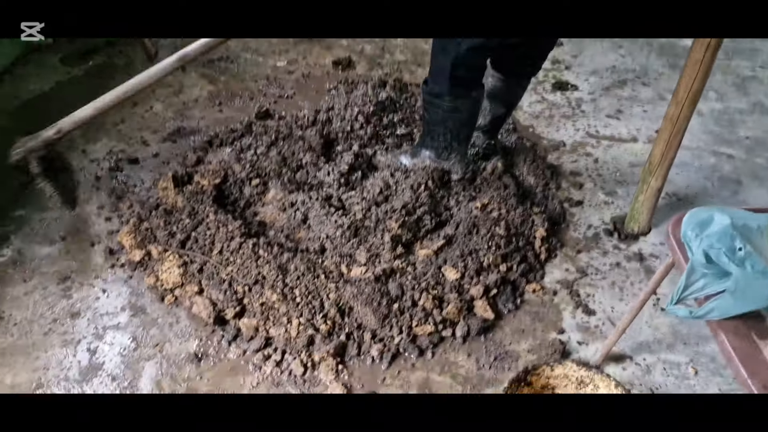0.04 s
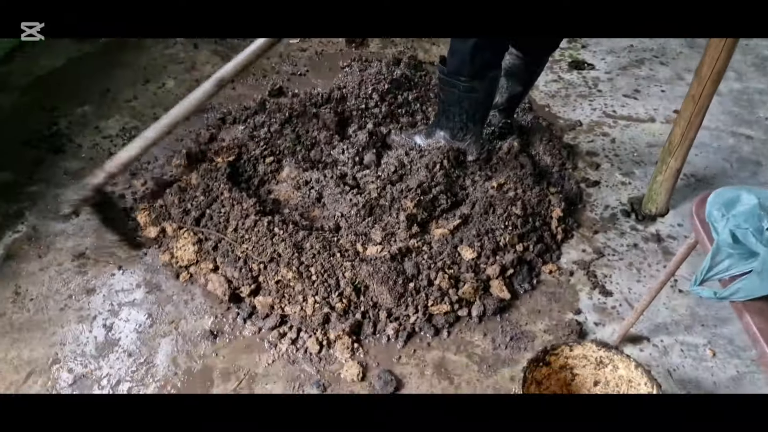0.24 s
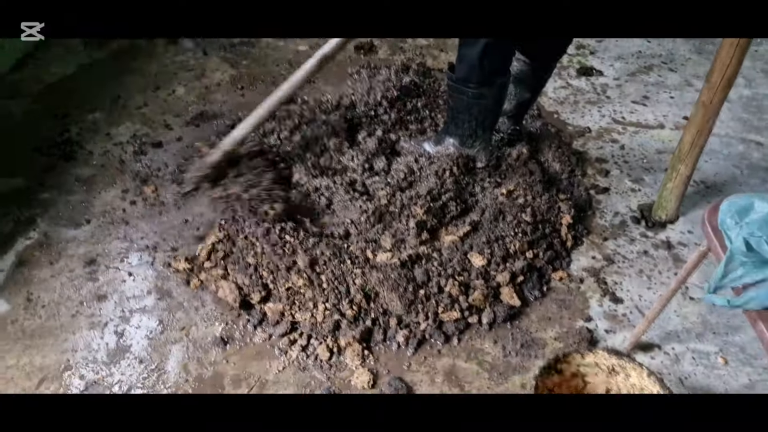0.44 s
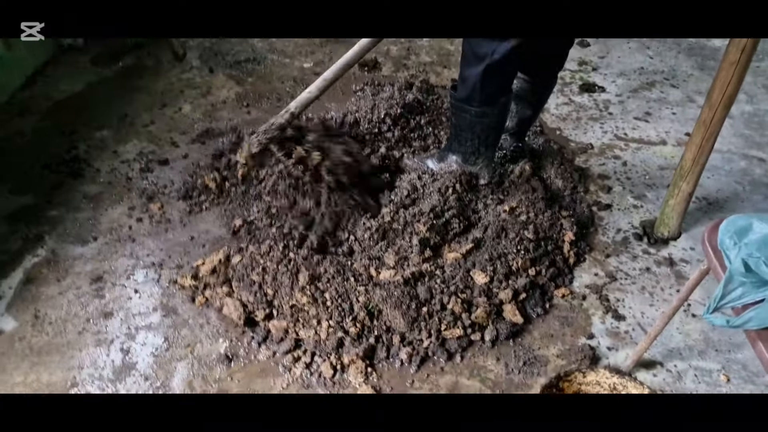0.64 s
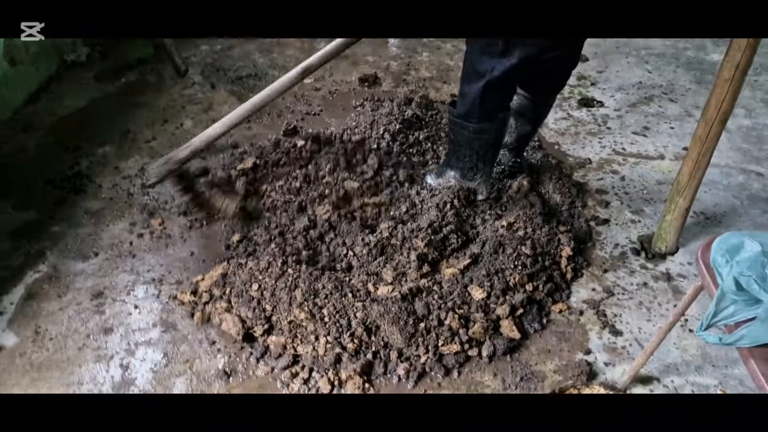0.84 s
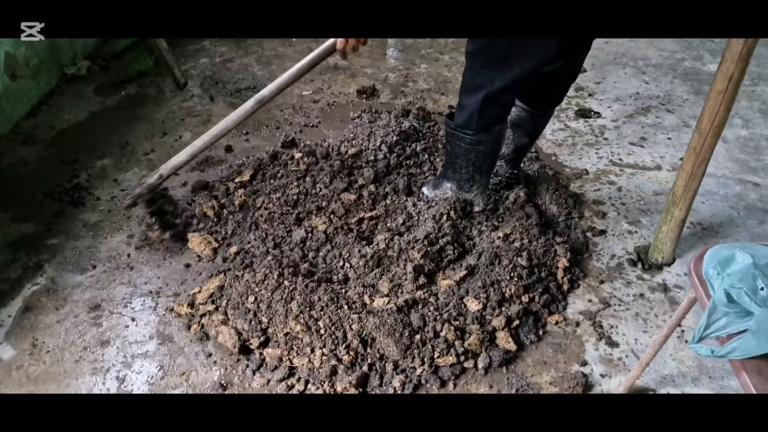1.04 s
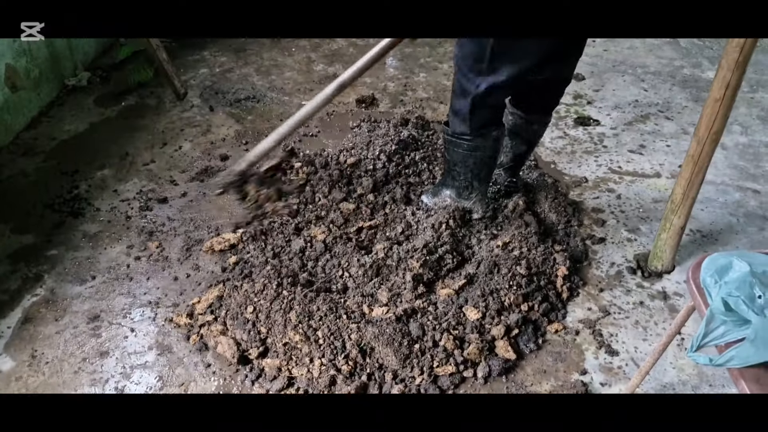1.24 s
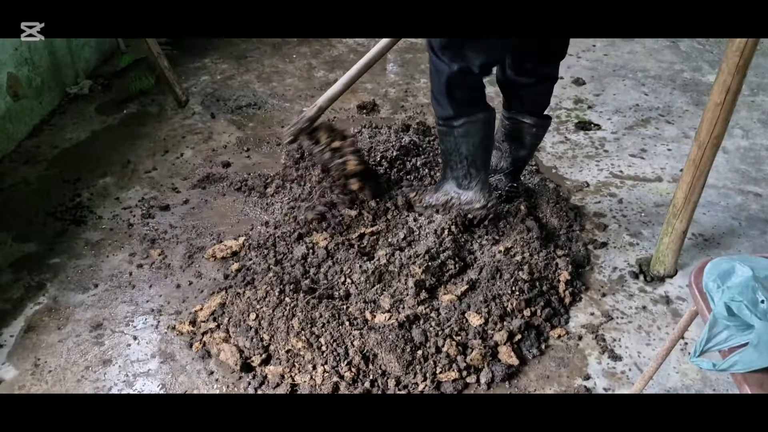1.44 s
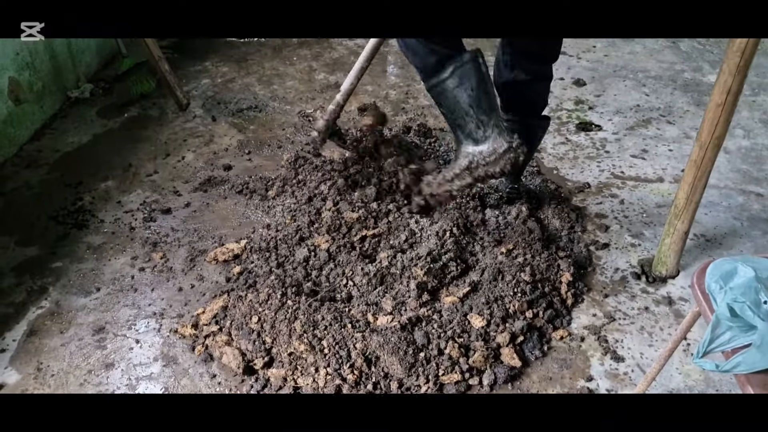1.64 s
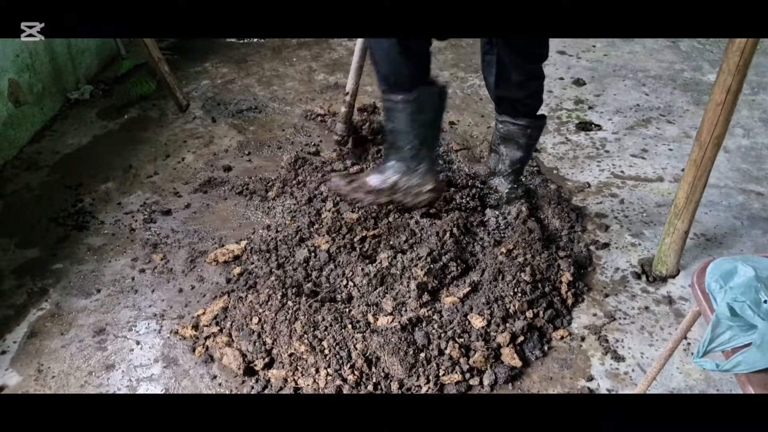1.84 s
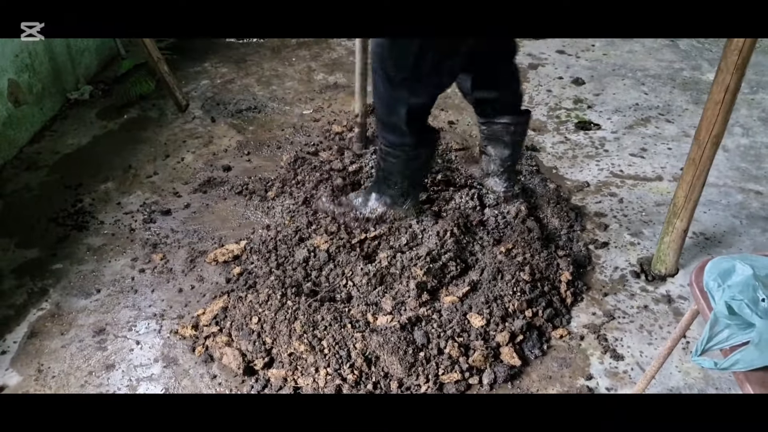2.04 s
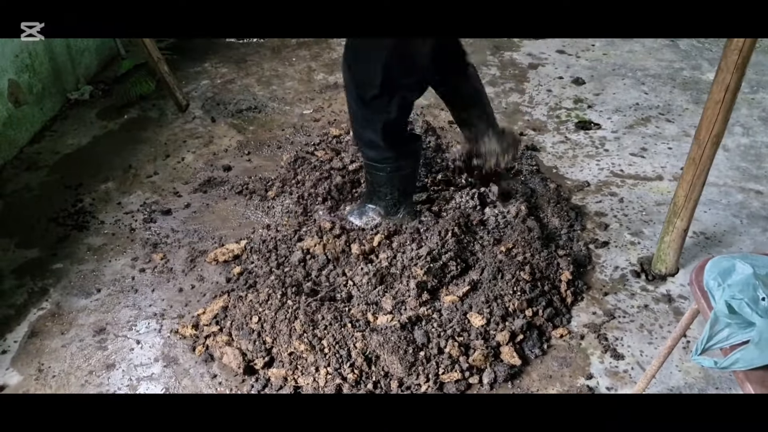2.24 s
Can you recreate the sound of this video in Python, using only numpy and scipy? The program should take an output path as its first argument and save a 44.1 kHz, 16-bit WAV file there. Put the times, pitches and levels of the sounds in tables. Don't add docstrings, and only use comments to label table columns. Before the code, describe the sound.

Hoe chopping and mixing cloddy clay on a concrete floor, with sharp steel knocks and soft boot thuds

```python
import sys
import numpy as np
from scipy import signal
from scipy.fft import rfft, irfft
from scipy.io import wavfile

SR = 44100
rng = np.random.default_rng(int(sys.argv[2]) if len(sys.argv) > 2 else 0)


def transcribe(u):
    v = np.clip(np.atleast_2d(u).T, -1, 1)
    q = np.round(v * 32767).astype(np.int16)
    wavfile.write(sys.argv[1], SR, q)


def makeup_ratio(level_db):
    decades = np.asarray(level_db, float) / 20
    return 10 ** decades


N = 101429
TIME = np.arange(N) / SR

STROKE_STARTS = [.2183, 1.033, 1.057, 1.128, 1.155, 1.386, 1.396, 1.515, 1.86, 1.995, 2.0718, 2.09, 2.2,
                 2.254]
# length/s, bright grit level/dB, dull clods level/dB, handle ring level/dB
STROKES = [(.15, -24.5, -31.5, -20.5), (0.024, -34.5, -37, -34), (0.013, -36.5, -49, -48),
           (0.028, -31, -48.5, -38), (0.096, -39, -36.5, -38.5), (.005, -46, -38.5, -54),
           (0.042, -52, -39, -30), (0.0067, -57, -48, -41.5), (0.1, -59.5, -56, -79),
           (0.079, -52.5, -49, -53), (0.019, -39.5, -30.5, -42.5), (0.018, -46.5, -37.5, -43.5),
           (0.024, -49.5, -39.5, -64), (0.016, -45, -56, -61)]
# f/Hz, level/dB per Hz
GRIT_COLOUR = [(1000, -9), (1250, -11), (2200, -13), (3300, -16.5), (4700, -13.5), (6200, -19), (8600, -18),
               (16000, -29.5)]
# f/Hz, level/dB per Hz
CLOD_COLOUR = [(100, -20), (280, -6), (900, 2.5), (1400, 6.5), (2000, 3.5), (2900, -3.5), (4500, -8.5),
               (9000, -51)]
# f/Hz, width/Hz, level/dB
HANDLE_TONES = [(520, 37, -6), (608, 96, -1.5), (726, 150, -9.5), (768, 30, 4.5), (833, 172, -1)]
# t/s, crack level/dB, crack f/Hz, knock level/dB, knock f/Hz
BLOWS = [
    (0.217, -12.5, 4900, -4.5, 709),
    (1.034, -23.5, 8100, -17, 816),
    (1.058, -17.5, 6660, -43, 705),
    (1.393, -38, 4400, -24, 1460),
    (2.0685, -33, 1500, -22.5, 1355),
    (2.071, -38, 1700, -27, 1610),
    (0.217, -10.5, 8400, -15.5, 320),
    (.218, -46, 2900, -20, 150),
    (1.035, -43, 2000, -28, 167),
    (1.058, -50, 6500, -27, 520),
]
# t/s, length/s, blade level/dB, shaft level/dB
DRAGS = [
    (0.082, 0.11, -64.5, -56),
    (0.732, 0.067, -78, -49),
    (0.787, 0.056, -48.5, -54),
    (0.808, 0.11, -48, -44),
    (0.898, 0.13, -57, -74),
    (1.913, 0.043, -75, -52),
]
# f/Hz, width/Hz, level/dB
BLADE_TONES = [(870, 91, -2), (1160, 60, -4), (1470, 29, 5), (2290, 74, 4), (2650, 310, -5.5),
               (3206, 80, 3), (3750, 120, -3), (4900, 230, -5)]
# f/Hz, width/Hz, level/dB
SHAFT_TONES = [(252.5, 44, 15.5), (303, 10, 6.5)]
# t/s, length/s, level/dB
SINGS = [
    (1.602, .02, -50),
    (1.665, 0.028, -70),
    (1.72, 0.05, -65),
]
# t/s, length/s, deep rumble level/dB, thump level/dB
THUDS = [
    (0.226, 0.021, -34, -26.5),
    (0.243, 0.15, -42, -45.5),
    (0.511, 0.021, -47.5, -54.5),
    (.9, 0.17, -56.5, -62),
    (1.026, 0.025, -42, -34),
    (1.072, 0.2, -47.5, -55),
    (1.181, 0.041, -70, -43),
    (1.436, 0.02, -76, -54),
    (1.934, 0.036, -75, -49),
    (2.081, 0.058, -63, -41.5),
]
# f/Hz, width/Hz, level/dB
SLAB_TONES = [(52.6, 11, 4), (67, 16, -0.5), (78.05, 45, -8.5)]
# f/Hz, width/Hz, level/dB
THUMP_TONES = [(150, 39, -5), (273, 47.5, -2.5), (464, 210, -6)]
# t/s, level/dB
CRUMBS = [(0.111, -49), (.61, -74), (0.724, -51), (.916, -41.5), (1.636, -42), (1.87, -51.5),
          (1.954, -48.5), (2.195, -42)]
# f/Hz, time to fall 60 dB/s
TAIL_TIMES = [(60, 0.41), (500, 0.55), (2000, 0.62), (6000, .5), (15000, 0.45)]
# f/Hz, likeness (-1 to 1)
LIKENESS = [(60, 0.92), (130, 0.94), (290, 0.86), (640, 0.37), (1300, -0.23), (3100, 0.06), (15000, -0.11)]
# f/Hz, level/dB per Hz
AIR_COLOUR = [(24, -43), (40, -12.5), (199, -10), (320, -4.5), (392, -8), (570, -7), (1210, -9),
              (3140, -16), (16000, -26.5)]
# f/Hz, left minus right level/dB
LEFT_PORT = [(300, 1), (1500, 1.1), (4000, -0.4), (9000, -1), (14000, -3.3)]


def rms_one(x):
    return x / np.sqrt(np.mean(x ** 2) + 1e-20)


def at_hz(points, hz):
    table = np.array(points)
    return np.interp(np.log(hz + 1e-9), np.log(table[:, 0]), table[:, 1])


def envelope(start, length, rise, end, fade_db=0.0):
    t = TIME - start
    hold = makeup_ratio(-fade_db * np.clip(t, 0, length))
    dying = np.exp(-np.clip(t - length, 0, None) / end)
    return np.clip(t / rise, 0, 1) * hold * dying


def drift(rate):
    r = np.exp(-2 * np.pi * rate / SR)
    noise = rng.standard_normal(N + SR)
    return rms_one(signal.lfilter([1], [1, -2 * r, r * r], noise)[SR:])


def grains():
    per_s, spread_db, lumpy_db = 5000, 1.5, 3
    sizes = makeup_ratio(spread_db * np.minimum(rng.exponential(1, N), 4)) * rng.choice([-1, 1], N)
    clicks = rng.random(N) < per_s / SR
    return rms_one(sizes * clicks * makeup_ratio(lumpy_db * drift(47)))


def coloured(x, spectrum):
    hz = np.fft.rfftfreq(x.shape[-1], 1 / SR)
    low_skirt = np.minimum(1, (hz / spectrum[0][0]) ** 2)
    high_skirt = np.minimum(1, (spectrum[-1][0] / (hz + 1)) ** 2)
    return rms_one(irfft(rfft(x) * makeup_ratio(at_hz(spectrum, hz)) * low_skirt * high_skirt, x.shape[-1]))


def body(x, peaks):
    out, power = 0, 0
    for k, (hz, width, db) in enumerate(peaks):
        r = np.exp(-np.pi * width / SR)
        feed = [(1 - r * r) / 2, 0, (r * r - 1) / 2]
        ring = [1, -2 * r * np.cos(2 * np.pi * hz / SR), r * r]
        out = out + (-1) ** k * makeup_ratio(db) * signal.lfilter(feed, ring, x + 1e-18)
        power += makeup_ratio(2 * db) * np.pi * width / SR
    return out / np.sqrt(power)


def high(x, hz):
    return signal.sosfilt(signal.butter(2, hz, "high", fs=SR, output="sos"), x)


def alike_pair(size):
    mid, side = rfft(rng.standard_normal((2, size)))
    alike = np.clip(at_hz(LIKENESS, np.fft.rfftfreq(size, 1 / SR)), -1, 1)
    pair = np.sqrt(1 + alike) * mid + np.sqrt(1 - alike) * side * [[1], [-1]]
    return irfft(pair, size) / np.sqrt(2)


def stroke_shapes(fade_db):
    return np.array([envelope(start, stroke[0], 0.002, 0.023, fade_db)
                     for start, stroke in zip(STROKE_STARTS, STROKES)])


def strokes():
    levels = makeup_ratio(np.array(STROKES)[:, 1:].T)
    bright, dull = levels[:2] @ stroke_shapes(33.5) / np.sqrt(2)
    wood = levels[2] @ stroke_shapes(100)
    spots = []
    for _ in range(3):
        grit = bright * coloured(grains(), GRIT_COLOUR)
        clods = dull * coloured(grains(), CLOD_COLOUR)
        spots.append(grit + clods)
    handle = [body(wood * grains(), HANDLE_TONES) / np.sqrt(2) for _ in range(2)]
    return spots + handle


def blows():
    crack_s, knock_lag_s, knock_t60_s = 0.0019, 0.001832, 0.056
    out, noise = np.zeros(N), coloured(rng.standard_normal(N), GRIT_COLOUR)
    for start, crack_db, crack_hz, knock_db, knock_hz in BLOWS:
        burst = makeup_ratio(crack_db - 6) * noise * envelope(start, crack_s, 0.0002, 0.0017)
        out += burst + body(burst, [(crack_hz, 1300, 0)]) * makeup_ratio(-6)
        t = np.clip(TIME - start - knock_lag_s, 0, None)
        knock = np.sin(2 * np.pi * knock_hz * t) * np.minimum(1, t / 0.0015)
        out += makeup_ratio(knock_db - 60 * t / knock_t60_s) * knock
    return out


def drags():
    shapes = np.array([envelope(start, length, 0.045, 0.019) for start, length, *_ in DRAGS])
    blade, shaft = makeup_ratio(np.array(DRAGS)[:, 2:].T) @ shapes
    hiss = makeup_ratio(-8.5) * blade * rms_one(body(grains(), [(1010, 800, -15), (2900, 530, 3)]))
    lifted = sum(makeup_ratio(db) * envelope(start, length, 0.005, 0.014) for start, length, db in SINGS)
    sing = lifted * rms_one(body(grains(), [(3190, 25, 0)]))
    blade_ring = body(blade * grains(), BLADE_TONES)
    shaft_ring = high(high(body(shaft * grains(), SHAFT_TONES), 214), 214)
    return blade_ring + shaft_ring + hiss + sing


def thuds():
    shapes = np.array([envelope(start, length, 0.0027, 0.035) for start, length, *_ in THUDS])
    deep, thump = makeup_ratio(np.array(THUDS)[:, 2:].T) @ shapes
    rumble = deep * rms_one(body(rng.standard_normal(N), SLAB_TONES))
    return rumble + body(thump * grains(), THUMP_TONES)


def crumbs():
    puffs = sum(makeup_ratio(db) * envelope(start, 0.0035, 0.00033, 0.0031) for start, db in CRUMBS)
    return puffs * rms_one(high(grains(), 4700))


def shed(sources):
    tail_db, tail_start_s, port_lag_s, pan_db = 1.5, 0.0036, 0.0003, 0.2
    size = int(0.8 * SR)
    edges = np.append(30 * 2 ** np.arange(0, 9.1, 0.75), 21000)
    t = np.arange(size) / SR
    noise = np.array([alike_pair(size) for _ in sources])
    tail = 0
    for low, top in zip(edges, edges[1:]):
        band = signal.sosfilt(signal.butter(2, [low, top], "band", fs=SR, output="sos"), noise)
        fading = band * makeup_ratio(-60 * t / at_hz(TAIL_TIMES, np.sqrt(low * top)))
        tail = fading - tail
    tail = tail * np.clip(t / tail_start_s - 0.5, 0, 1)
    tail = makeup_ratio(tail_db) * rms_one(tail) / np.sqrt(size)
    for k in range(len(sources)):
        lag = int(port_lag_s * SR * (1.35 - 0.15 * k))
        tail[k, 1, lag] += makeup_ratio(-pan_db)
    tail[:, 0, 0] += makeup_ratio(pan_db)
    heard = signal.fftconvolve(np.array(sources)[:, None], tail, axes=2)[..., :N]
    return heard.sum(axis=0) / np.sqrt(2)


def quiet_air():
    level_db = -54 + 1.5 + 1.0 * drift(0.83)
    return makeup_ratio(level_db) * coloured(alike_pair(N), AIR_COLOUR)


def scene():
    air = quiet_air()
    return shed(strokes() + [blows() + crumbs(), drags() + thuds()]) + air


def band_limit(x):
    return signal.sosfilt(signal.butter(12, 16820, fs=SR, output="sos"), x)


def record(dry):
    tilt_db = at_hz(LEFT_PORT, np.fft.rfftfreq(N, 1 / SR)) / 2
    ports = irfft(rfft(dry) * makeup_ratio(tilt_db * [[1], [-1]]), N)
    low_cut = high(high(ports, 41), 37)
    soft = 1.5 * np.tanh(low_cut / 1.5)
    top_cut = signal.ellip(10, 0.5, 60, 16050, fs=SR, output="sos")
    mix = signal.sosfilt(top_cut, soft)
    return band_limit(mix)


dry = scene()
out = record(dry)
transcribe(out)
```